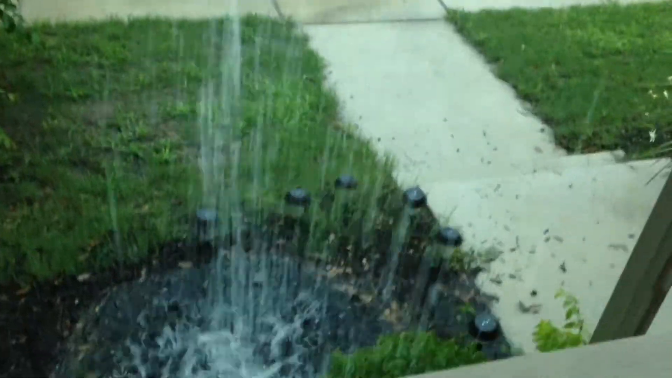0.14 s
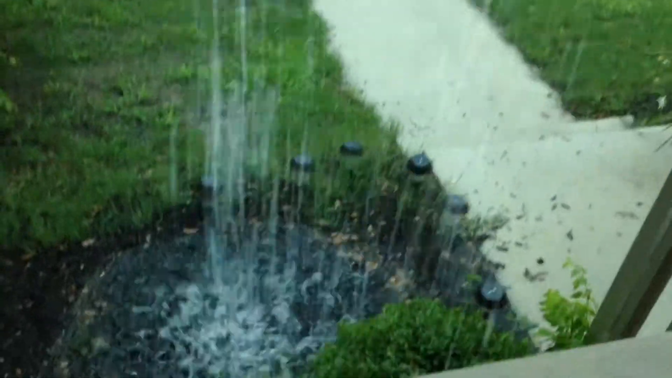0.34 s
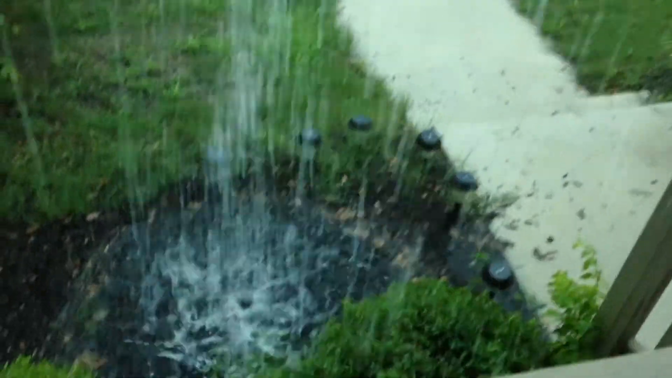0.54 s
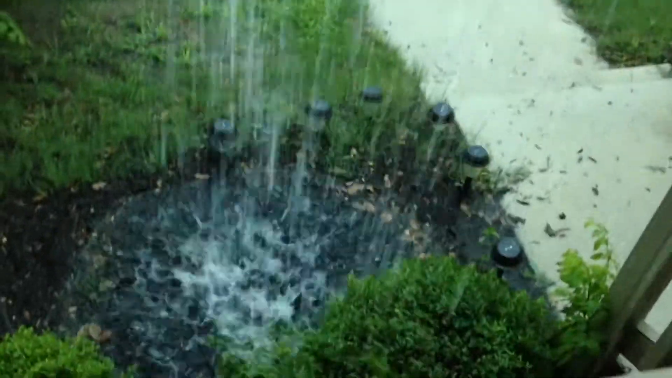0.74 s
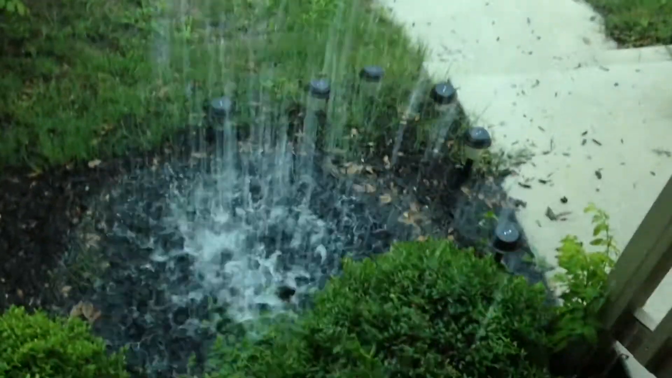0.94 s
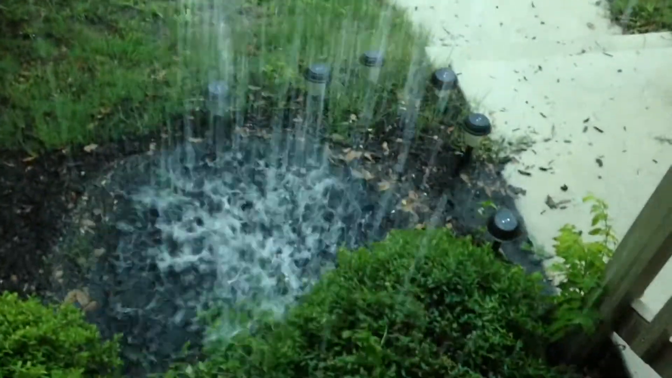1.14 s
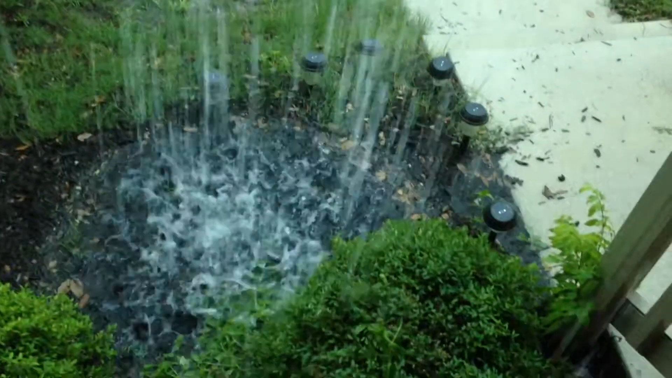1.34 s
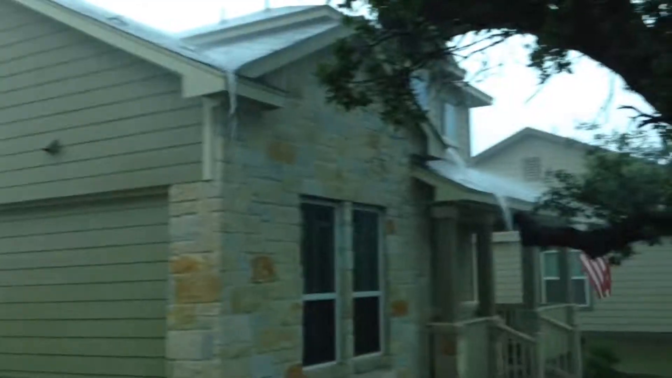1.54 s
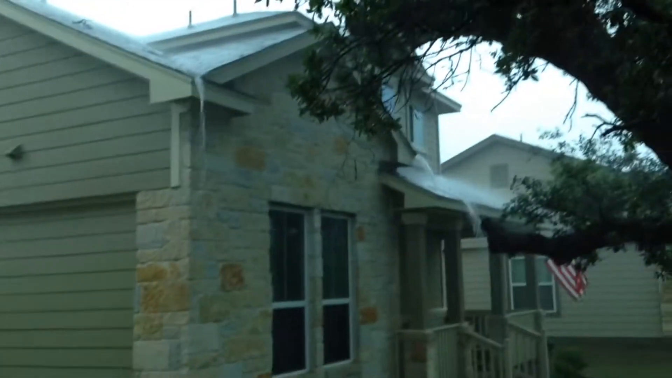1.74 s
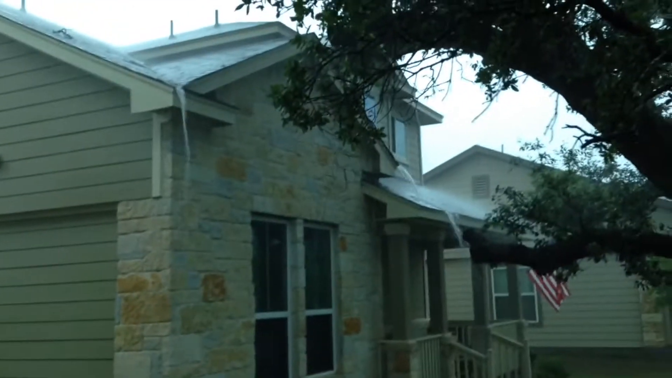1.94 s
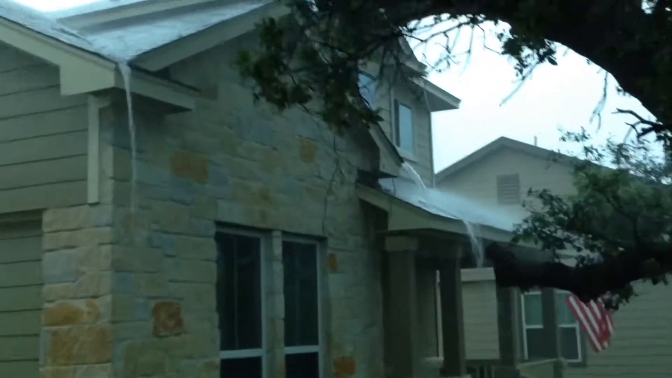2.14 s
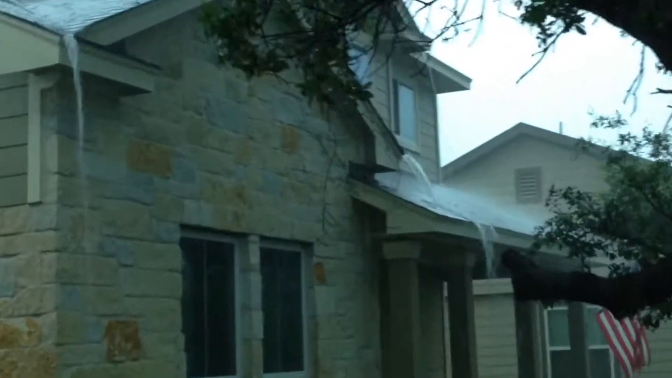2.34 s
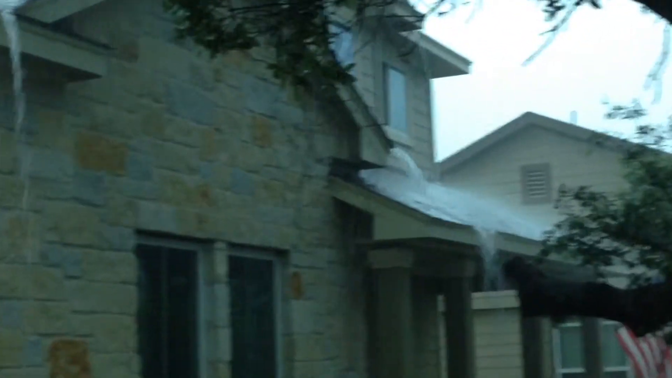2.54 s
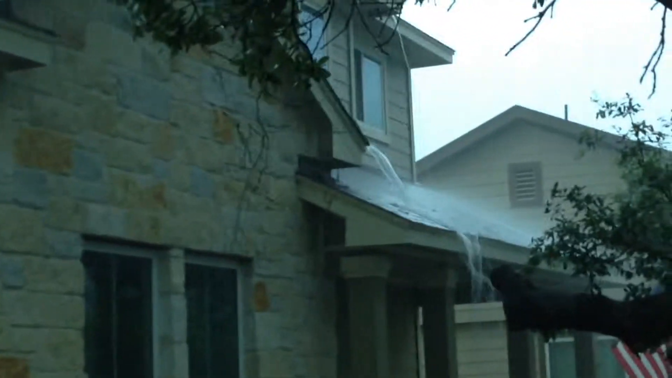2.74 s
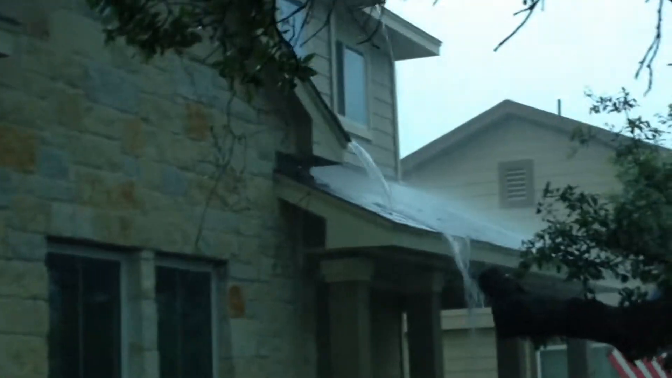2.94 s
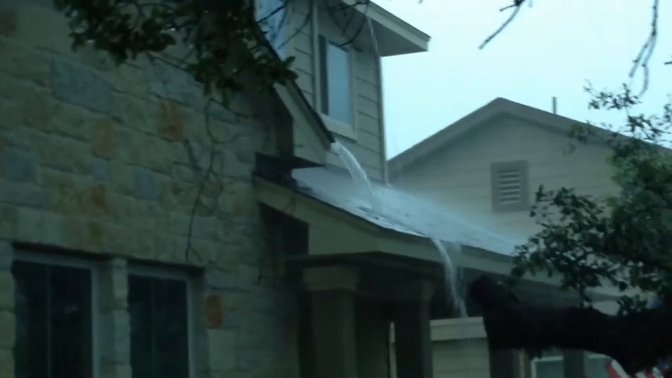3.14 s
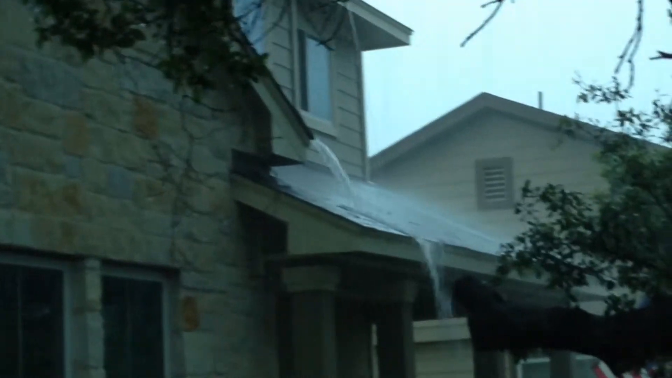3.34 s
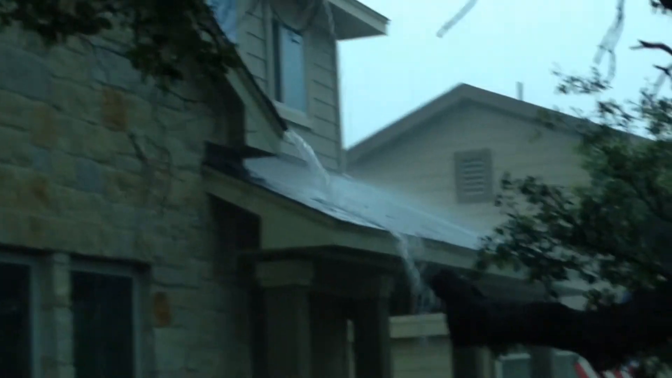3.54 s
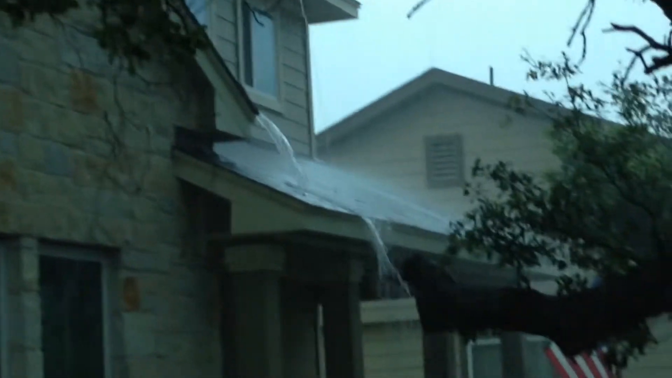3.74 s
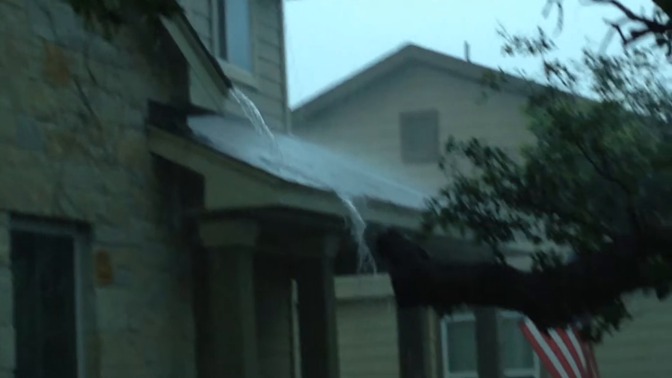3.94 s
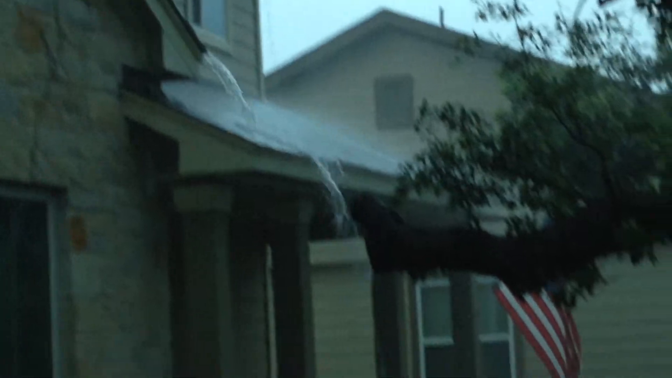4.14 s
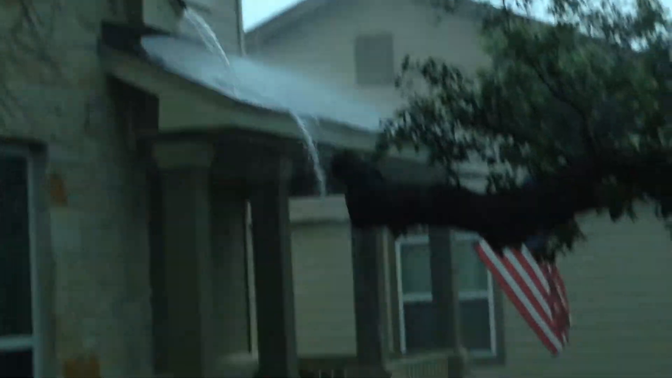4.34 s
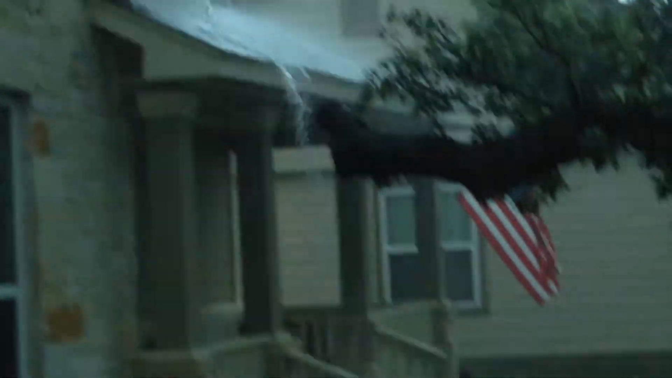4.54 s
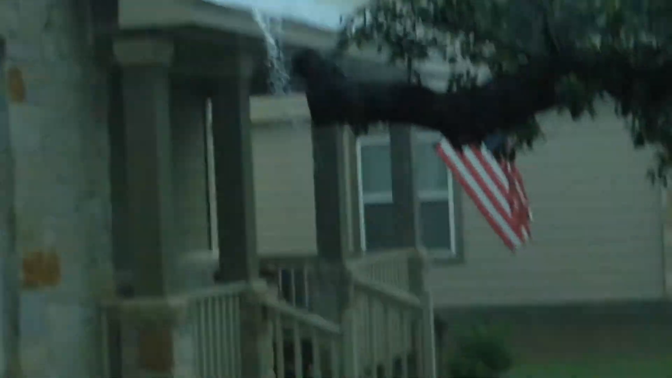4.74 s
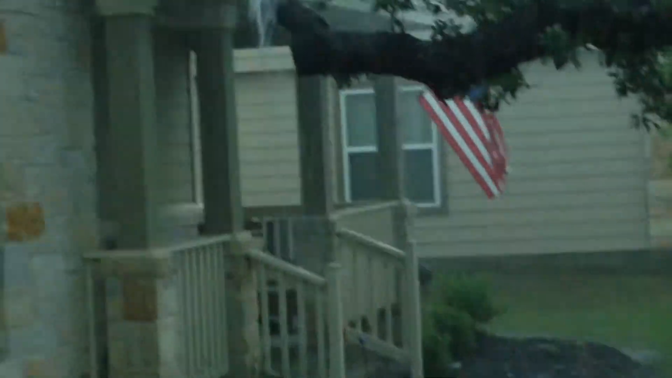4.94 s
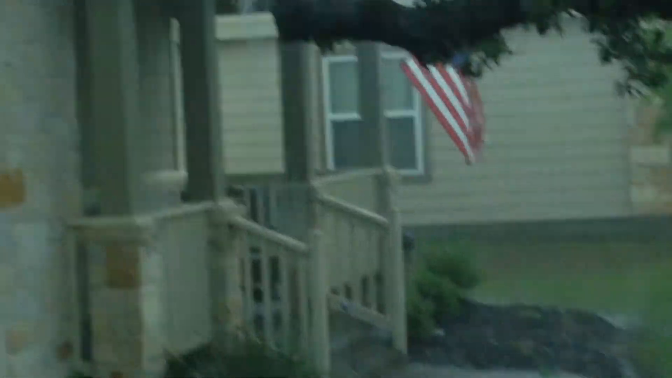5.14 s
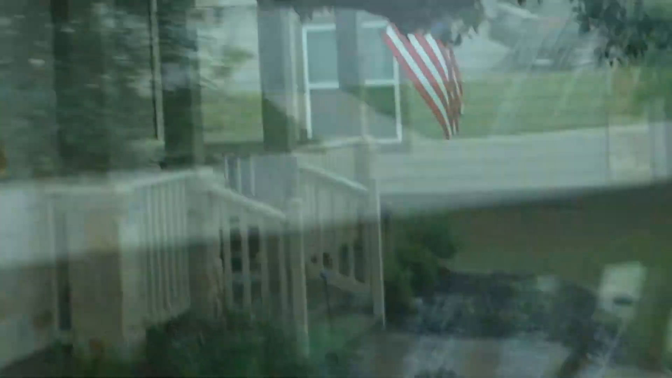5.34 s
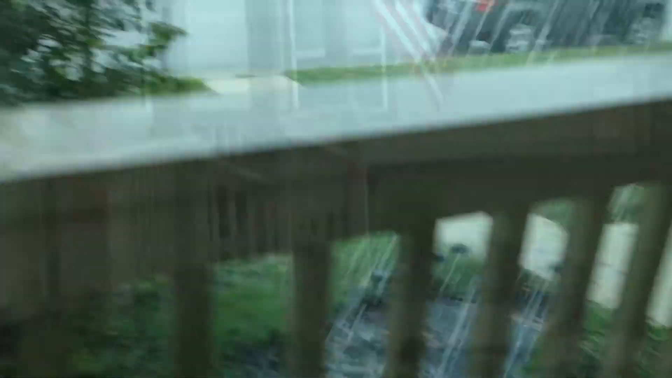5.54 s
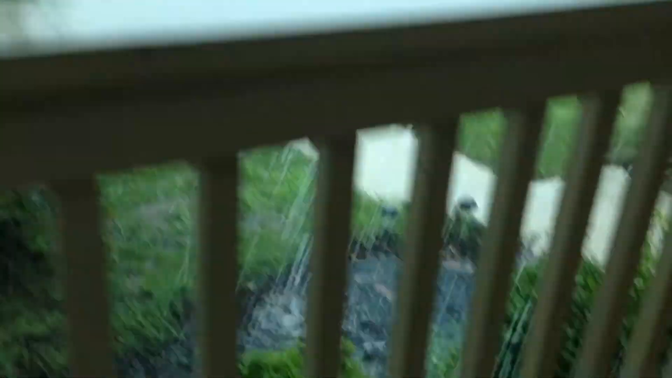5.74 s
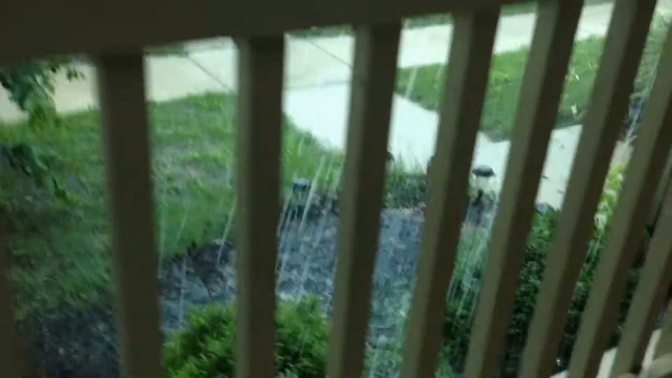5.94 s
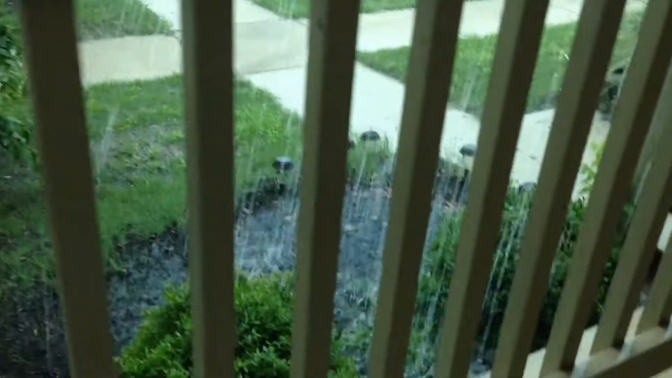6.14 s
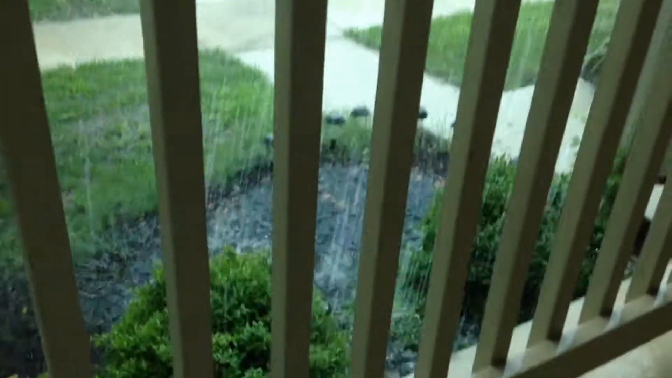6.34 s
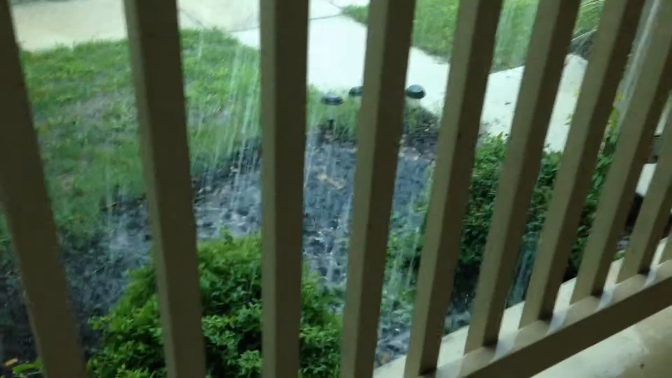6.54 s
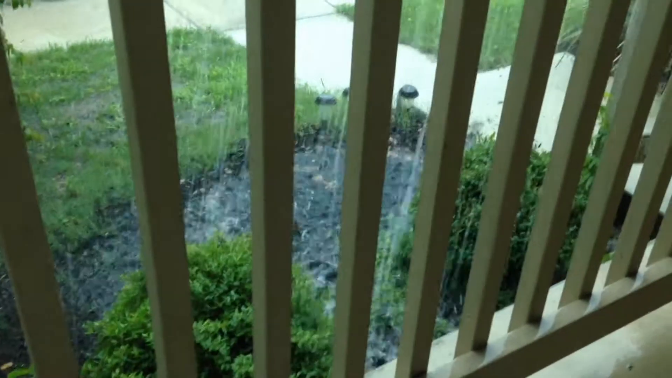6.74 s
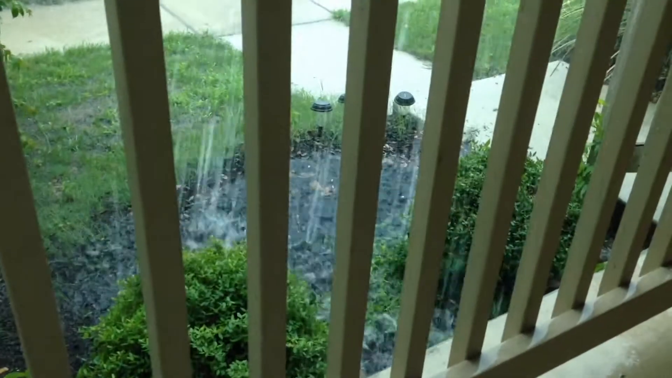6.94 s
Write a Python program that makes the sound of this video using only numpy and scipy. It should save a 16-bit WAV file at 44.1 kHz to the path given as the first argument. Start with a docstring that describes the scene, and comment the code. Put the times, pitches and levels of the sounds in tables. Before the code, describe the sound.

A downpour heard from a porch, with the same sound in both channels. From 0 to 1.4 s roof run-off pounds a wet flower bed close by: a bright, dense, full hiss with crackling spray, slaps and sharp splashes, strongest around 0.9 to 1.3 s, over a modest low roar. At about 1.44 s it fades out and in very quickly. Until 5 s the rain is farther and thinner, a steady hiss with small clumps of spatter and occasional drips, while uneven low wind rumble and soft thuds buffet the microphone, notably near 1.5, 2.6 and 3.0 s. From 5 to 5.8 s the tone gradually blends into a nearer, fuller one, the hiss dipping briefly around 5.4 s. From then to 7.1 s wind weakens and clear wet plops, ticks and splashing run-off patter close by, still going at the end.

```python
"""Downpour from a porch

Rain heard at three spots: over the roof run-off that pounds a flower bed, facing the neighbouring roofs
in the wind, then low behind the railing. Far drops are coloured noise, run-off is filtered clicks and
ringing bubbles, big drops are short rings in spray, and wind on the microphone is low noise and pushes.
The sound fades out and in at the first move; at the second the colours of the two spots dissolve."""
import sys
import numpy as np
from scipy import signal
from scipy.fft import rfft, irfft
from scipy.io import wavfile
from scipy.ndimage import uniform_filter1d

SR = 44100
rng = np.random.default_rng(int(sys.argv[2]) if len(sys.argv) > 2 else 0)


def log_audio(samples):
    """Write samples as a 16-bit WAV file to the path given in sys.argv[1]."""
    # one column per channel
    frames = np.atleast_2d(samples).T
    # limit to full scale, then quantise
    limited = np.clip(frames, -1, 1)
    pcm = np.round(limited * 32767).astype(np.int16)
    wavfile.write(sys.argv[1], SR, pcm)


N = 312228
T = np.arange(N) / SR  # seconds
MOVE_S = 1.437  # first change of spot
SPLIT_HZ = 300  # the rumble lies below, the far rain above

# Steady run-off near the microphone, one list before the first move and one after it.
# Each row: time in seconds, slap gain in dB, splash gain in dB, fine spray gain in dB.
RUN_OFF_FLOW = [
    [(0.0, -33.5, -32.5, -24), (0.21, -35, -34, -32), (0.55, -34, -32, -25), (0.582, -48, -51, -46),
     (0.62, -41, -32, -24.5), (0.8, -36, -32, -25), (0.9, -37, -29, -24), (0.96, -39, -28.5, -24.5),
     (1.1, -40, -30, -23), (1.15, -36, -30, -25), (1.2, -36, -30, -24), (1.24, -37, -28.5, -22),
     (1.262, -51, -37, -31), (1.285, -40, -28.5, -20), (1.35, -39, -29, -24), (1.415, -37, -29, -24.5)],
    [(1.47, -37, -40, -37), (1.7, -55, -40.5, -41), (2.4, -42, -42, -34), (2.85, -45, -38, -30.5),
     (3.6, -52, -40.5, -38), (4.3, -44, -40.5, -34), (5.0, -47, -38.5, -35), (5.3, -39, -38.5, -35),
     (5.39, -43, -40.5, -36), (5.45, -37, -34, -29), (5.55, -41, -34.5, -33), (5.62, -37, -34, -28.5),
     (5.72, -39, -33, -26), (5.755, -41, -38, -33), (5.79, -33, -29.5, -27), (5.9, -37, -32.5, -31),
     (6.2, -38, -32.5, -25), (6.36, -35, -32.5, -30), (6.5, -37, -32.5, -25), (6.6, -39, -28.5, -29),
     (6.7, -35, -32, -33), (6.85, -40, -30.5, -26), (6.97, -39, -28.5, -25), (7.02, -49, -36, -32),
     (7.08, -37, -26, -27)],
]
# Low roar of water and wind, one list before the first move and one after it.
# Each row: time in seconds, gain in dB.
RUMBLE_LEVEL = [
    [(0.0, -39.5), (0.7, -39.5), (1.415, -41)],
    [(1.47, -35), (1.5, -40), (1.62, -32.5), (1.76, -36), (1.9, -31.5), (1.98, -38), (2.04, -33),
     (2.07, -46), (2.16, -36), (2.22, -35), (2.29, -37), (2.36, -38), (2.44, -39.5), (2.66, -37),
     (2.9, -41), (3.02, -36), (3.2, -44), (3.38, -35.5), (3.52, -37.5), (3.6, -33.5), (3.67, -39),
     (3.74, -35.5), (3.87, -34.5), (3.96, -43), (4.1, -41), (4.25, -36), (4.53, -41.5), (4.6, -33),
     (4.67, -37), (4.75, -34), (4.83, -37), (4.92, -30.5), (5.04, -35.5), (5.12, -35), (5.19, -41.5),
     (5.6, -38.5), (6.06, -42.5), (7.08, -38.5)],
]


def undb(db):
    """Decibels to gain."""
    return 10 ** (np.asarray(db) / 20)


def unit(x):
    """Scale to rms 1."""
    return x / np.sqrt(np.mean(x ** 2))


def columns(tables):
    """Sample-rate curves from a table before the first move and one after it."""
    curves = []
    for rows in tables:
        seconds, *values = np.transpose(rows)
        curves.append([np.interp(T, seconds, v) for v in values])
    return [np.where(T < MOVE_S, before, after) for before, after in zip(*curves)]


def walk(rate):
    """Random levels held 1 / rate s and smoothed twice over that time; rms 1."""
    hold = int(SR / rate)
    steps = np.repeat(rng.standard_normal(N // hold + 1), hold)
    smooth = uniform_filter1d(uniform_filter1d(steps, hold), hold)
    return unit(smooth[:N])


def band(x, lo_hz, hi_hz, order=1):
    """Band-pass with gain 1 in the middle."""
    sos = signal.butter(order, [lo_hz, min(hi_hz, .45 * SR)], "band", fs=SR, output="sos")
    return signal.sosfilt(sos, x)


def colour(x, spectrum, size=8192):
    """Causal filter with the given (Hz, dB) shape, from the folded cepstrum."""
    hz, db = np.transpose(spectrum)
    bins_hz = np.fft.rfftfreq(size, 1 / SR)
    shape_db = np.interp(np.log(bins_hz + 1), np.log(hz), db)
    cepstrum = irfft(np.log(undb(shape_db)))
    # folding onto positive times gives minimum phase
    cepstrum[1:size // 2] *= 2
    cepstrum[size // 2 + 1:] = 0
    impulse = irfft(np.exp(rfft(cepstrum)))
    return signal.fftconvolve(x, impulse)[:N]


def at_each_spot(x, lo_hz, hi_hz):
    """The colour follows the listening spot; each spot's colouring is scaled to rms 1 in the band lo-hi."""
    # Sound colour over the flower bed, facing the roofs and behind the railing.
    # Each row: frequency in Hz, relative density in dB per Hz.
    bed = [(18, -53), (30, -9), (75, -2.5), (113, 5.5), (146, 3), (185, 4), (407, -1.5), (489, -1),
           (529, -5.5), (723, -0.5), (891, -5.5), (1130, -3), (1500, -5.5), (5390, -3.5), (13800, -2.5),
           (15300, 0)]
    roofs = [(18, -57), (30, -13), (50, -9), (66, 3.5), (85, -1.5), (108, -1.5), (125, 3), (145, -2.5),
             (242, -11.5), (429, -15), (620, -19.5), (760, -18), (1200, -19), (1850, -17), (2450, -18.5),
             (2700, -21), (3300, -18.5), (4370, -18.5), (5400, -19), (13400, -17.5), (15300, -19)]
    railing = [(18, -36), (30, -8), (64, 5.5), (140, -0.5), (201, 5), (348, -5.5), (762, -6), (915, -9.5),
               (1100, -6.5), (1460, -8), (1900, -3.5), (2400, -7), (2900, -10.5), (3640, -7), (4050, -6),
               (8200, -5.5), (11200, -5.5), (13800, -3), (15300, -5.5)]
    dissolve_start_s, dissolve_end_s = 5, 5.8
    mix = np.clip((T - dissolve_start_s) / (dissolve_end_s - dissolve_start_s), 0, 1)
    shares = (T < MOVE_S, (T >= MOVE_S) * (1 - mix), mix)
    out = 0
    for spectrum, share in zip((bed, roofs, railing), shares):
        coloured = colour(x, spectrum)
        out = out + share * coloured / np.std(band(coloured, lo_hz, hi_hz, order=4))
    return out


def patter(per_s, spread_db, tail_ms):
    """Scattered impacts, a few much larger than most, each a click with a short noisy tail."""
    when, size = rng.random((int(per_s * N / SR), 2)).T
    hits = np.zeros(N)
    hit_power = undb(-2 * spread_db * np.log(1 - .995 * size))
    np.add.at(hits, (when * N).astype(int), hit_power)
    power = signal.lfilter([1], [1, -np.exp(-1000 / (tail_ms * SR))], hits)
    return unit(np.sqrt(power) * rng.standard_normal(N))


def far_rain():
    """Countless distant drops blend into a hiss with a fine patter; each range flickers a little alone."""
    # Distant rain, dipping while two spots dissolve. Each row: time in seconds, gain in dB.
    far_level = [(0, -28.5), (.7, -28), (1.4, -31), (1.5, -30), (3, -31), (5.2, -30.5), (5.33, -30),
                 (5.41, -34), (5.55, -32.5), (5.65, -29.5), (6.2, -28), (7.08, -28)]
    drops = rng.standard_normal(N) + 0.52 * patter(300, spread_db=2.0, tail_ms=1.5)
    hiss = at_each_spot(drops, 2650, 14360)
    hiss = signal.sosfilt(signal.butter(2, SPLIT_HZ, "high", fs=SR, output="sos"), hiss)
    for hz in (500, 1000, 2000, 4000, 8000):
        flicker = undb(0.62 * walk(12)) - 1
        hiss = hiss + flicker * band(hiss, hz / 0.96, hz * 1.84)
    return hiss * undb(np.interp(T, *np.transpose(far_level)))


def near_water(lo_hz, hi_hz, shared, count):
    """Drops of different sizes sound in different ranges; sharp shared ticks reach them all."""
    edges = np.geomspace(lo_hz, hi_hz, count + 1)
    out = 0
    for lo, hi in zip(edges, edges[1:]):
        own = patter(.12 * lo, spread_db=3.0, tail_ms=8000.0 / lo)
        own = own + 0.73 * patter(40, spread_db=1.5, tail_ms=5.6)
        out = out + band(0.76 * own + shared, lo, hi)
    return unit(at_each_spot(out, lo_hz, hi_hz))


def plops(per_s, lo_hz, hi_hz, cycles):
    """Drops into puddles trap bubbles that ring briefly and rise in pitch."""
    out = np.zeros(N + 1024)
    when, pitch, size = rng.random((int(per_s * N / SR), 3)).T
    starts = (when * N).astype(int)
    pitches_hz = lo_hz * (hi_hz / lo_hz) ** pitch
    gains = undb(-2.5 * np.log(1 - .97 * size))
    for i, hz, gain in zip(starts, pitches_hz, gains):
        turns = hz * T[:1024]
        ring = np.exp(-turns / cycles) * np.sin(2 * np.pi * turns * (1 + 0.004 * turns))
        out[i:i + 1024] += gain * ring
    return unit(out[:N])


def run_off():
    """Gains of slap, splash and spray: an uneven steady flow plus the clumps, added as powers."""
    # Clumps of run-off that land together. Each row: time of the peak in seconds,
    # length in ms (twice the fall time), slap gain in dB, splash gain in dB.
    clumps = [(.2, 60, -33, -40), (.415, 40, -45, -36), (.64, 60, -46, -32), (.935, 19, -44, -28),
              (1.03, 60, -38, -28), (1.178, 18, -33, -28.5), (1.23, 30, -36, -31), (1.29, 40, -42, -30),
              (1.77, 25, -38, -35), (1.93, 50, -36, -38), (2.05, 70, -36, -35), (2.11, 18, -35, -42),
              (2.18, 75, -35.5, -45), (2.31, 43, -39, -36), (2.46, 54, -35.5, -32.5), (2.88, 40, -37, -40),
              (3.195, 33, -38, -30.5), (3.27, 30, -49, -35), (3.34, 25, -48, -34), (3.42, 70, -36, -32.5),
              (3.55, 25, -37, -35), (3.98, 30, -35, -48), (4.08, 62, -37, -36), (4.2, 67, -41, -39),
              (4.35, 40, -37, -35), (4.45, 40, -38, -39), (4.56, 57, -35, -39), (4.69, 30, -44, -36),
              (4.78, 32, -42, -30), (4.93, 26, -40, -36), (5.06, 47, -37, -35), (5.14, 25, -35, -40),
              (5.51, 40, -42, -35), (5.63, 41, -42, -30.5), (5.82, 51, -40, -38), (6.23, 30, -29, -35),
              (6.3, 71, -34, -28), (6.42, 39, -36, -33), (6.64, 32, -42, -32), (6.8, 50, -33, -35)]
    uneven_db, changes_per_s = 0.85, 22
    rise_share = 0.83  # rise time re the fall time
    spray_db = -7  # fine spray gain re the splash gain
    power = undb(np.array(columns(RUN_OFF_FLOW)) + uneven_db * walk(changes_per_s)) ** 2
    for s, ms, slap_db, splash_db in clumps:
        near = slice(int((s - .15) * SR), int((s + .15) * SR))
        late_ms = (T[near] - s) * 1000
        length_ms = ms * np.where(late_ms < 0, rise_share, 1)
        swell = np.exp(-(2 * late_ms / length_ms) ** 2)
        power[:, near] += undb([[slap_db], [splash_db], [splash_db + spray_db]]) ** 2 * swell
    return np.sqrt(power)


def rain():
    """Far hiss plus the near run-off, whose low slap, splash and fine spray swell in clumps."""
    shared = 0.71 * patter(900, spread_db=2.5, tail_ms=0.12) + 0.57 * patter(70, spread_db=2.5, tail_ms=5.7)
    slap = 0.71 * near_water(1140, 2780, shared, count=3) + 0.46 * plops(150, 1392, 2523, cycles=7.0)
    splash = 0.97 * near_water(2510, 7280, shared, count=3) + 0.32 * plops(150, 2855, 5450, cycles=9.7)
    spray = 0.57 * near_water(7670, 14700, shared, count=2)
    return far_rain() + np.sum(run_off() * [slap, splash, spray], axis=0)


def rumble():
    """Low roar of water and wind: noise below the split that throbs unevenly."""
    throbbing = rng.standard_normal(N) * undb(2.5 * walk(25))
    roar = at_each_spot(throbbing, 40, SPLIT_HZ)
    roar = signal.sosfilt(signal.butter(2, SPLIT_HZ, "low", fs=SR, output="sos"), roar)
    return roar * undb(columns(RUMBLE_LEVEL)[0])


def splats():
    """Splashes at random moments, stronger where the run-off is near, weaker around one dull pitch."""
    per_s, lo_hz, hi_hz = 40, 1690, 9200
    base_db, rise_db = -5, 8.5  # re the splash flow; extra at the highest pitch
    dull_hz, dull_octaves, dull_db = 3000, 0.25, -6
    when, pitch, size = rng.random((int(per_s * N / SR), 3)).T
    s = .02 + when * (T[-1] - .1)
    flow_db = columns(RUN_OFF_FLOW)[1][(s * SR).astype(int)]
    db = flow_db + base_db + rise_db * pitch - 2.1 * np.log(1 - .9 * size)
    hz = lo_hz * (hi_hz / lo_hz) ** pitch
    db += dull_db * np.exp(-(np.log2(hz / dull_hz) / dull_octaves) ** 2)
    return list(zip(s, db, hz))


def big_drops():
    """Each drop rings for a few cycles, rising in pitch, inside a burst of spray around that pitch."""
    # Loud splashes, a plop, tick or spit at its own pitch.
    # Each row: time in seconds, base level in dB, centre in Hz.
    loud_drops = [(0.161, -32, 1700), (0.162, -12, 12900), (0.257, -18, 12100), (0.416, -19, 4900),
                  (0.416, -7.5, 10000), (0.531, -19, 4700), (0.655, -17, 5200), (0.68, -26, 1140),
                  (0.83, -15, 11000), (0.907, -16, 4500), (0.907, -13, 7960), (0.915, -22, 2400),
                  (0.929, -8, 9400), (1.019, -10, 11200), (1.028, -21, 4300), (1.121, -23, 5000),
                  (1.174, -15, 4080), (1.175, -24, 2100), (1.231, -21, 2500), (1.286, -13, 5530),
                  (1.312, -19, 11800), (1.361, -19, 8900), (1.378, -23, 2300), (1.406, -27, 1300),
                  (1.406, -26, 5500), (1.562, -36, 1820), (2.435, -31, 1700), (2.47, -34, 2250),
                  (2.876, -21, 10500), (3.191, -31, 2100), (3.187, -27, 4350), (3.195, -25, 4670),
                  (3.265, -25, 4100), (3.395, -31, 3710), (3.396, -36, 2350), (3.414, -27, 2380),
                  (3.415, -27, 5100), (3.445, -22, 9400), (3.561, -29, 2420), (3.821, -28, 3860),
                  (3.965, -34, 1800), (4.067, -31, 1630), (4.098, -31, 1890), (4.131, -33, 1600),
                  (4.253, -29, 5000), (4.341, -34, 2080), (4.396, -32, 1720), (4.449, -28.5, 2420),
                  (5.255, -32, 2180), (5.479, -20, 11000), (5.537, -32, 1850), (5.581, -28, 4400),
                  (5.616, -26, 3650), (5.646, -27, 4500), (5.494, -31, 1540), (5.511, -28, 4590),
                  (5.734, -24, 4700), (5.786, -31, 1690), (5.603, -29, 1550), (5.799, -22, 4600),
                  (5.816, -27, 2080), (5.816, -17, 11100), (5.827, -22, 1760), (5.868, -24, 4200),
                  (5.869, -23.5, 2090), (5.951, -23, 5000), (6.007, -24, 4100), (6.108, -20, 11700),
                  (6.148, -25, 4400), (6.226, -21.5, 1680), (6.241, -28, 2120), (6.277, -29, 1750),
                  (6.277, -26, 4100), (6.284, -14, 11200), (6.292, -21, 4650), (6.311, -29, 1990),
                  (6.325, -24, 2060), (6.391, -30, 1820), (6.394, -24, 3980), (6.418, -20, 1910),
                  (6.433, -24, 2160), (6.532, -30, 1950), (6.551, -23, 4030), (6.585, -18, 4850),
                  (6.589, -28, 2370), (6.638, -20, 5900), (6.721, -25, 1980), (6.731, -25, 2400),
                  (6.77, -24.5, 1870), (6.791, -23, 4020), (6.802, -25, 2600), (6.808, -31, 1500),
                  (6.802, -23, 3960), (6.858, -21, 10000), (6.875, -19, 4100), (6.903, -28, 4440),
                  (6.88, -20, 9100), (6.945, -24, 4100), (6.966, -27, 2320), (6.984, -26, 1890),
                  (7.064, -14, 9400)]
    spray_ms_at_4k, spray_slope = 2.3, .45  # higher splashes are shorter
    tail_gain, tail_s = 0.1, 0.015  # faint after-spatter
    # pairs: before and after the first move, broad slaps on the bed, then clearer drips
    rise_cycles, fall_cycles = (0.1, 0.5), (2.4, 5.5)
    ring_peak = (1.0, 1.35)  # re the base level
    spray_width = (1.45, 1.2)  # frequency ratio either side
    out, t = np.zeros(N), T[:2048]
    drops = loud_drops + splats()
    noises = rng.standard_normal((len(drops), len(t)))
    for (s, db, hz), noise in zip(drops, noises):
        moved = int(s > MOVE_S)
        ms = spray_ms_at_4k * (4000 / hz) ** spray_slope
        swell = (1 - np.exp(-t * hz / rise_cycles[moved])) * np.exp(-t * hz / fall_cycles[moved])
        ring = swell * np.sin(2 * np.pi * hz * t * (1 + 15 * t))
        width = spray_width[moved]
        fall = 0.39 * np.exp(-t * 1000 / ms) + tail_gain * np.exp(-t / tail_s)
        spray = unit(band(noise, hz / width, hz * width, order=2)) * fall
        drop = undb(db) * (ring_peak[moved] * ring / np.max(ring) + spray)
        i = int((s - ms / 3000) * SR)  # starts a third of the spray time early
        out[i:i + len(t)] += drop[:N - i]
    return out


def eddies():
    """Small wind buffets at random moments, mostly low, their level following the rumble."""
    per_s, lo_hz, hi_hz = 36, 73.6, 346
    base_db = -4.5  # re the rumble gain, before the random spread
    when, pitch, size = rng.random((int(per_s * N / SR), 3)).T
    s = .1 + when * (T[-1] - .2)
    rumble_db = columns(RUMBLE_LEVEL)[0][(s * SR).astype(int)]
    db = rumble_db + base_db - 3.4 * np.log(1 - .95 * size)
    return list(zip(s, db, lo_hz * (hi_hz / lo_hz) ** pitch ** 2))


def buffets():
    """An eddy pushes the membrane for a cycle or two; the push is lopsided, with a harder edge."""
    # Wind buffets and knocks on the microphone.
    # Each row: centre time in seconds, level of the main swing in dB before the low cut, centre in Hz.
    strong_buffets = [(1.496, -25, 118), (1.514, -23, 99), (1.532, -27, 82), (1.558, -23, 110),
                      (1.623, -26, 101), (1.667, -27, 328), (1.7, -28, 100), (1.733, -27, 90),
                      (1.813, -24.5, 100), (1.9, -30, 120), (1.817, -27, 410), (2.021, -24, 100),
                      (2.239, -24, 120), (2.256, -35, 124), (2.319, -31, 129), (2.599, -18.5, 88),
                      (2.601, -24.5, 322), (2.645, -16.5, 100), (2.645, -33, 220), (2.646, -23, 420),
                      (2.661, -22, 125), (2.706, -30, 110), (2.797, -33, 380), (2.8, -26, 100),
                      (2.838, -24.5, 412), (2.861, -23.5, 90), (2.988, -22.5, 250), (3.011, -24, 300),
                      (3.014, -17, 170), (3.12, -33, 390), (3.376, -29, 90), (3.481, -27, 92),
                      (3.533, -26, 110), (3.569, -28, 109), (3.825, -25, 100), (3.888, -33, 100),
                      (4.02, -26, 130), (4.159, -29, 95), (4.197, -32, 113), (4.255, -24.5, 90),
                      (4.27, -24, 300), (4.34, -27, 300), (4.291, -27, 110), (4.339, -26, 150),
                      (4.588, -24.5, 133), (4.736, -26, 100), (4.879, -29, 120), (4.89, -30, 170),
                      (4.909, -25, 100), (4.97, -23, 75), (5.024, -23, 230), (5.03, -25, 476),
                      (5.08, -28, 90), (5.097, -27, 250), (5.1, -28, 500), (5.105, -26, 120),
                      (5.128, -27, 230), (5.263, -23, 255), (5.293, -30, 250), (5.865, -21, 124),
                      (5.994, -31, 328), (6.111, -28.5, 392), (6.113, -26, 99), (6.227, -25.5, 99)]
    push_cycles = 1.39  # scales the length of a push
    out, t = np.zeros(N), T[:4096] - T[2048]
    pushes = strong_buffets + eddies()
    for (s, db, hz), turn in zip(pushes, rng.random(len(pushes))):
        ms = 1000 * push_cycles / hz
        angle = 2 * np.pi * (hz * t + 0.28 * turn)
        swing = np.exp(-(t * 1000 / (0.54 * ms)) ** 2) * np.cos(angle)
        swing += 0.26 * np.exp(-(t * 1000 / (0.44 * ms)) ** 2) * np.cos(2.1 * angle)
        swing += 0.14 * np.exp(-(t * 1000 / (0.29 * ms)) ** 2) * np.cos(3.5 * angle)
        i = int(s * SR) - 2048
        out[i:i + len(t)] += undb(db) * swing
    return signal.sosfilt(signal.butter(3, 48, "high", fs=SR, output="sos"), out)


def scene():
    """All sources, faded out and in at the first move; one microphone feeds both channels."""
    fade_out_s, fade_in_s = 0.028, 0.03
    fade = np.interp(T, [MOVE_S - fade_out_s, MOVE_S, MOVE_S + fade_in_s], [1, 0, 1])
    return np.tile(fade * (rain() + big_drops() + rumble() + buffets()), (2, 1))


def record(dry):
    """The recorder cuts the top steeply."""
    top_hz = 15350
    return signal.sosfilt(signal.ellip(12, .2, 65, top_hz, fs=SR, output="sos"), dry)


dry = scene()
out = record(dry)
log_audio(out)
```